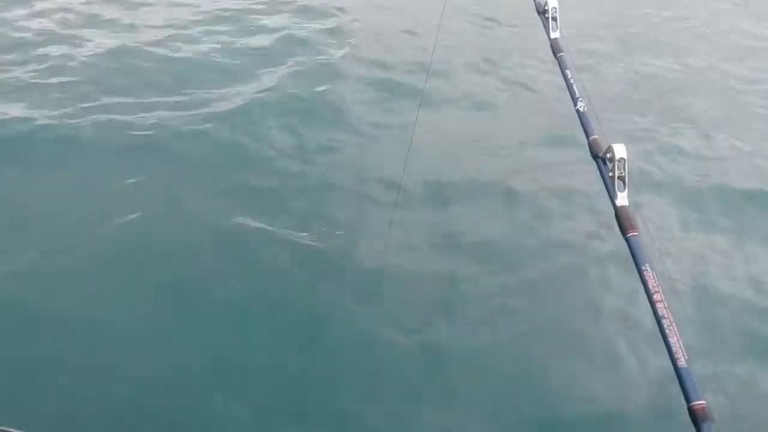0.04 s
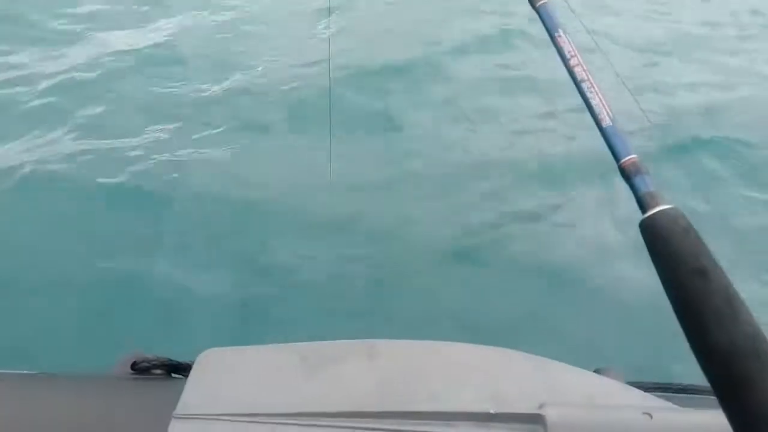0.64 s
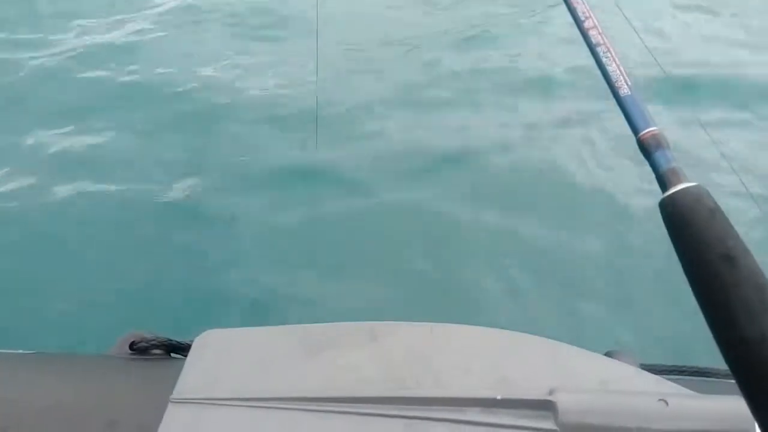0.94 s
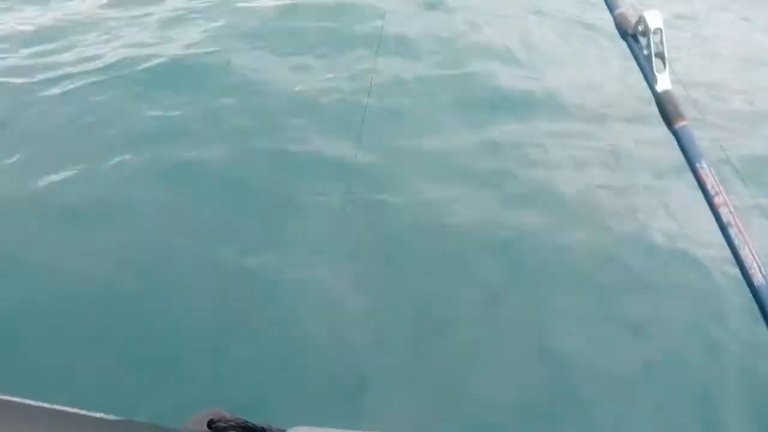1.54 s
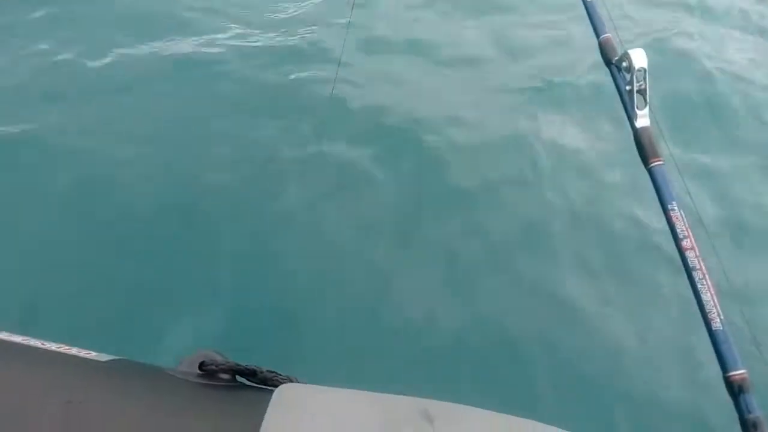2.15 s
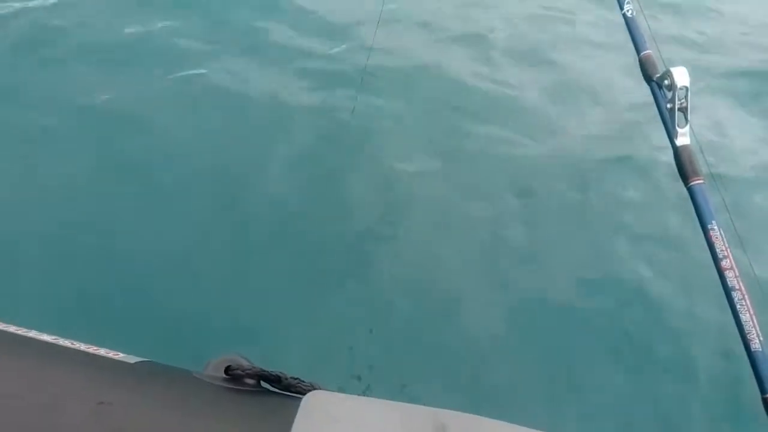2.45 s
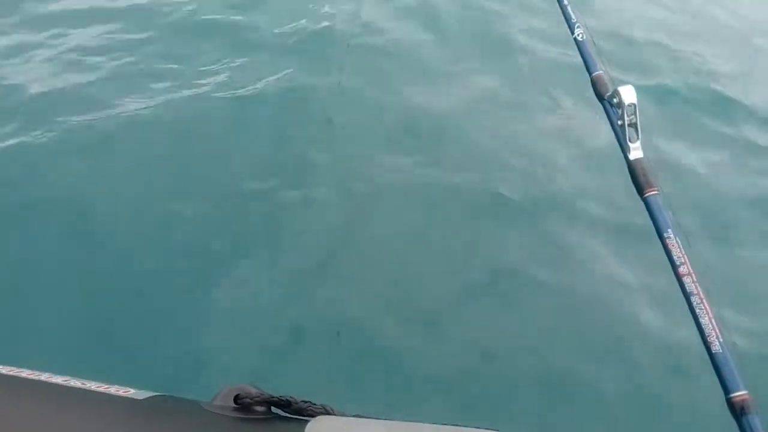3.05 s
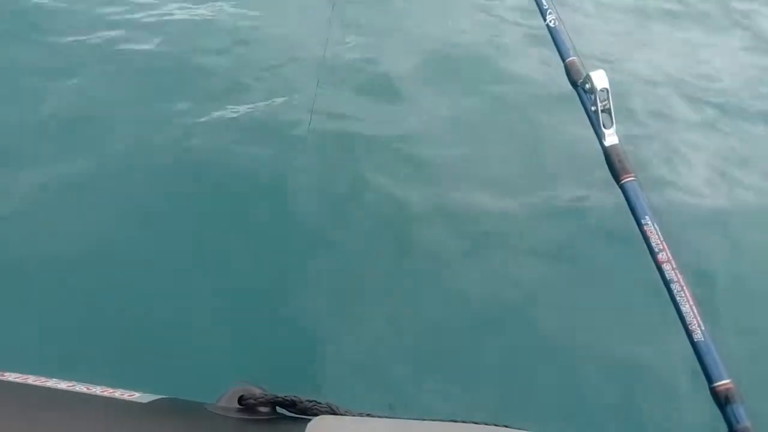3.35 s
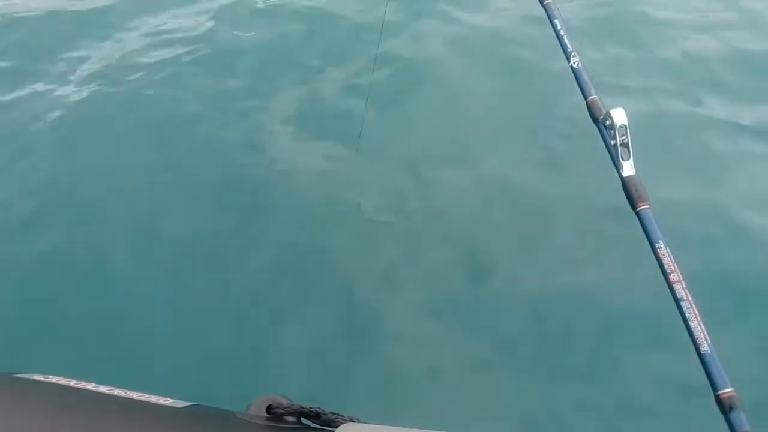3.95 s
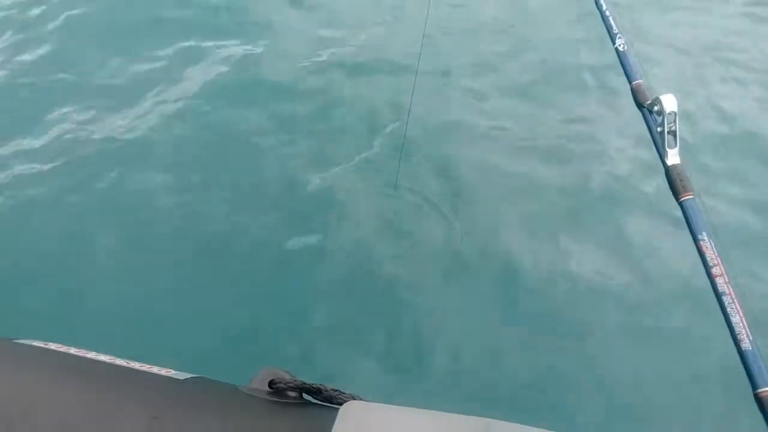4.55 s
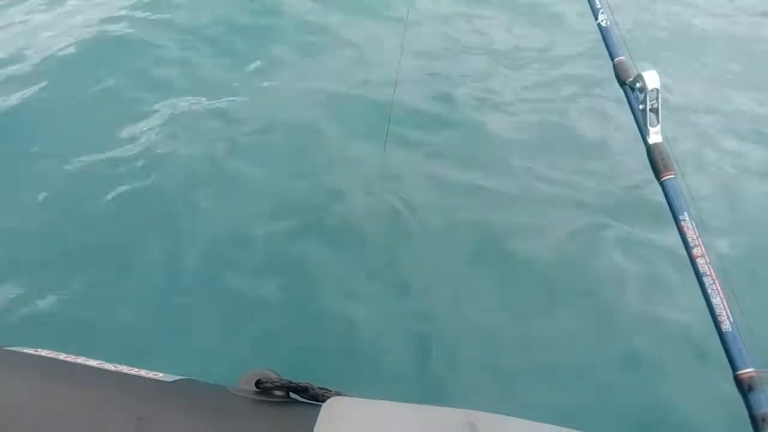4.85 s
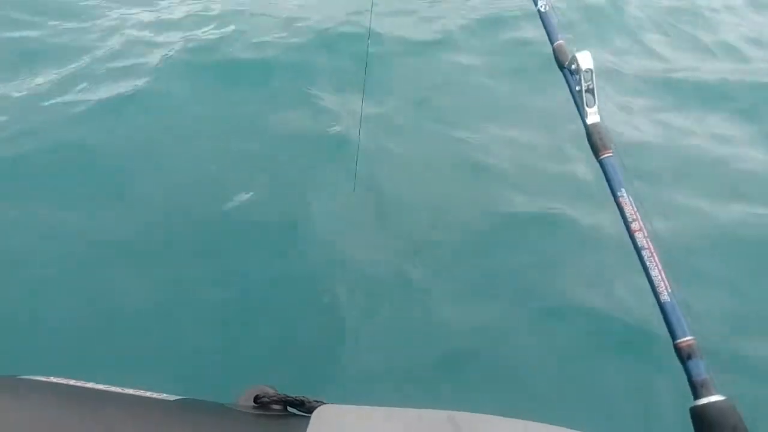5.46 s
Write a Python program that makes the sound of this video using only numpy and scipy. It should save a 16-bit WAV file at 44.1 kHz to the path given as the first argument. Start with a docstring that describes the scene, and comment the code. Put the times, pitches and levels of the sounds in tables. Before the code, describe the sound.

A close electric fishing reel runs with a steady, raspy gear whine that sags a little under load. Low wind rumble hits the microphone at the start, eases, then returns stronger as the fishing rod gives several hollow knocks against its holder on the boat. The motor finally winds down and stops with a small metallic snap and a few more knocks. The sea washes faintly underneath throughout.

```python
"""An electric fishing reel winds in line on a small boat, close to a microphone with two ports. Its meshing
gears whine, chatter and rasp, sagging as the swell loads the line, until the power is cut, the motor runs down
and a switch latch clicks. Gusts buffet each port over a faint wash of sea. The rod knocks in its holder,
thudding through the hull and ringing the reel's frame."""
import sys
import numpy as np
from scipy import signal
from scipy.fft import rfft, irfft, next_fast_len
from scipy.io import wavfile
from scipy.ndimage import uniform_filter1d

SR = 44100
rng = np.random.default_rng(int(sys.argv[2]) if len(sys.argv) > 2 else 0)


def unload_audio(sound):
    """Save the sound as a 16-bit wav file, at the path given as the first command line argument."""
    columns = np.transpose(np.atleast_2d(sound))
    # keep every value between -1 and 1, then stretch to whole-number steps
    steps = np.round(np.clip(columns, -1, 1) * 32767)
    wavfile.write(sys.argv[1], SR, steps.astype(np.int16))


N = 246959
TIME = np.arange(N) / SR
POWER_OFF_S, CRUISE_HZ = 5.119, 186
MESH_ORDER, WIRY_ORDER = 93 / 16, 17.8125  # an order is a multiple of the shaft rate

# The motor labours as the swell loads the line. Each row: time in seconds, shaft turns per second.
DRIVEN_SPEED = [(0, 187.3), (.47, 185.9), (.7, 192.9), (.8, 190.1), (.9, 193), (1.19, 195.1), (1.42, 185.8),
                (1.66, 187.6), (1.85, 185.6), (2.15, 187.4), (2.27, 184.9), (2.97, 187), (3.44, 179.7),
                (3.64, 183.6), (3.9, 176.3), (4.22, 180.1), (4.59, 178.2), (4.84, 190.7), (5.12, 194.4)]
# The microphone tips towards the reel. Each row: time in seconds, tilt from 0 to 1.
MIC_TILT = [(0, 0.2), (.35, 0.38), (.7, 0.69), (1.3, 0.67), (1.6, 0.42), (1.9, 0.2), (4.6, 0.09),
            (4.9, 0.13)]
# The notes of the pinion and of the spool gear. Each row: order, relative level in dB.
PINION_TONES = [(11, -13), (12, -.7), (12.1875, -14), (12.625, -11.5), (13, -5), (14, -13), (15, -17),
                (17, -17), (22.625, -19), (23.625, -15), (24, -15.5)]
SPOOL_GEAR_TONES = [(1, -14.5), (2, -18), (4.9375, -15), (5.3125, -10), (5.8125, -2.5), (6.1875, -6),
                    (6.8125, -12), (7.1875, 3.5), (10, -17)]
# The housing lifts tones that glide across its resonances. Each row: frequency in Hz, gain in dB.
HOUSING_EQ = [(370, -1.5), (700, -24), (1080, 0.5), (1350, -23), (1550, 1), (1850, 1.5), (2130, -4),
              (2240, -0.5), (2320, -1.5), (2480, -9), (2900, -5.5), (3220, -11), (3450, -8), (3900, -8.5),
              (4400, -4.5), (4600, -5), (6000, -24)]
# Fader rides for pinion, mesh octave, wiry overtone and whistle. Each row: time in seconds, gain in dB.
PINION_FADER = [(0, -35.5), (.42, -35), (.7, -29.5), (1.15, -28.5), (1.6, -29.5), (2.05, -34), (2.8, -34.3),
                (3.5, -34), (4.1, -33.3), (4.8, -32.5), (5.12, -30)]
OCTAVE_FADER = [(0, -51), (.45, -47), (.8, -39.5), (1.05, -34.5), (1.5, -39), (2, -44), (2.5, -48),
                (3.3, -44), (4.05, -45), (4.6, -47), (4.95, -38), (5.12, -38)]
WIRY_FADER = [(0, -57), (.47, -46), (.68, -59), (1.22, -62), (1.42, -46.5), (1.6, -49), (1.8, -58),
              (2.25, -47), (3, -50), (3.35, -46), (3.85, -45), (4.68, -50), (4.9, -65), (5.135, -62),
              (5.16, -40)]
WHISTLE_FADER = [(0, -54), (.5, -49), (1.2, -56), (1.6, -57), (2, -68), (4.2, -66), (4.9, -53)]
# Loose teeth chatter and thinly whistle. Each row: order, width in Hz, relative level in dB.
CHATTER_BANDS = [(6.194, 200, -8), (6.841, 154, -7), (8.85, 247, -20), (10.78, 240, -9.5),
                 (11.22, 405, -13.5), (12.4, 330, -5.5), (13.9, 130, -14), (16.71, 270, -10.5),
                 (17.55, 170, -9.5), (23.6, 220, -12.5), (30.67, 220, -22), (34.9, 340, -28)]
WHISTLE_BANDS = [(29.3, 150, 2)]
# Dry rasp of teeth and running line. Each row: frequency in Hz, relative level in dB.
RASP_SPECTRUM = [(100, -1), (650, -12.5), (830, -7), (1050, 0), (1280, 3), (1420, -3), (1650, -.5),
                 (2400, 2), (2650, 1), (2860, -3.5), (3100, -1), (3300, -1.5), (3450, -6.5), (3750, -8.5),
                 (4300, -10), (5150, -13), (5700, -12.5), (6100, -14), (6600, -13), (8200, -24),
                 (10000, -28), (11600, -23.5), (15000, -41)]
# How alike the two ports sound. Each row: frequency in Hz, likeness from 0 to 1.
PORT_LIKENESS = [(100, 0.79), (1100, 0.82), (2200, 0.41), (2700, 0.94), (3300, 0.69), (6000, 0.23),
                 (15000, 0)]
# The reel's colour at full tilt. Each row: frequency in Hz, gain in dB.
TILT_EQ = [(400, 4), (650, 1), (900, -5), (1420, -4.5), (1650, 0), (2200, -6), (2550, -1.5), (2780, 1.5),
           (3080, 1), (3400, -12.5), (3750, -5), (4350, -6), (4560, -11), (4850, 3), (5200, -3),
           (5700, -.5), (6800, -8.5), (8500, -5.5), (11500, -12)]
# The reel's stereo balance. Each row: frequency in Hz, left minus right in dB.
PORT_BALANCE = [(500, 1.5), (1080, 0.5), (1500, -2.5), (1950, -6.5), (2240, -5.8), (2700, 2.5), (2950, 2),
                (3300, 8), (3450, 9), (3750, 6), (4400, 7.5), (5000, -1), (6500, -6.5), (8000, -4),
                (9500, 0.5), (11500, -6.5), (14000, -1)]
# Sound bends around the microphone's body. Each row: frequency in Hz, left port's lead in radians.
LEFT_LEAD = [(50, 1), (500, -0.95), (1100, 0.17), (2240, 1.2), (2650, 2.5), (3010, 4), (3250, 4),
             (3700, 2.5), (4390, 2), (6370, 2), (8100, 3), (11600, 7.5), (15000, 11)]
# The breeze lulls and picks up again. Each row: time in seconds, strength in dB.
BREEZE = [(0, -25.5), (.7, -30.5), (1.15, -31.5), (1.9, -38), (2.9, -43), (3.62, -43), (3.8, -34),
          (4.5, -30.5), (4.9, -33), (5.25, -29.5), (5.6, -31)]
# Gusts. Each row: start in seconds, length in seconds, strength in dB, port (0 left, 1 right).
GUSTS = [(0, 0.084, -11, 1), (0, 0.048, -18, 0), (0.39, .06, -23, 1), (0.483, 0.083, -25, 0),
         (0.572, 0.21, -23.5, 1), (0.647, 0.035, -23, 0), (1.054, 0.0325, -24.5, 0),
         (1.172, 0.023, -23.5, 1), (1.458, 0.027, -24.5, 1), (1.614, .03, -30.5, 0), (1.715, 0.023, -30, 1),
         (1.848, 0.026, -30, 1), (1.981, 0.027, -19.5, 1), (2.031, 0.042, -19.5, 1), (2.199, 0.15, -33, 1),
         (2.424, 0.13, -23.5, 1), (2.74, 0.037, -35.5, 0), (2.969, 0.027, -34.5, 1), (3.331, 0.16, -31, 1),
         (3.924, 0.048, -16, 1), (4.066, 0.049, -16.5, 1), (4.156, .11, -17, 1), (4.32, 0.14, -16, 1),
         (4.5, 0.037, -13, 1), (4.504, 0.037, -22.5, 0), (4.934, 0.033, -16, 1), (5.052, 0.0758, -16, 1),
         (5.371, 0.028, -27, 1), (5.475, 0.075, -19, 1), (5.533, 0.013, -25.5, 0)]
# Low wind buffet, its brighter flutter, and the sea. Each row: frequency in Hz, relative level in dB.
BUFFET_SPECTRUM = [(15, -16), (35, -19), (60, -2.5), (100, 2.5), (150, -0.5), (250, -10.5), (400, -28.5),
                   (700, -59.5), (1500, -74), (4000, -71), (15000, -106)]
FLUTTER_SPECTRUM = [(60, -13.5), (200, 6), (330, 1.5), (500, -10), (800, -16.5), (1300, -51.5),
                    (2500, -71.5), (8000, -80)]
SEA_SPECTRUM = [(30, -24), (90, 9), (150, 16.5), (400, -12), (1000, -9), (2000, -16), (4000, -27),
                (8000, -37), (15000, -58)]
# Slaps of wind. Each row: centre in seconds, peak in dB, half width in seconds.
WIND_SLAPS = [(0.013, 0.5, 0.00041), (0.0206, 2.5, 0.00095), (0.0268, -5, 0.00044), (0.0302, -4, 0.00051),
              (0.037, -3.5, 0.00045), (0.0507, -6.5, .0007), (.0553, -7, 0.00044), (0.069, -1.5, 0.00093),
              (.091, -6.5, 0.00045), (.686, -3.5, 0.00088), (2.007, -8.5, 0.0023), (2.067, -6, 0.0021),
              (2.48, -13.5, 0.000818), (4.029, -10, 0.0009), (4.243, -7, 0.00074), (4.533, -6.5, 0.00083),
              (4.968, -10, 0.00098), (5.092, -6.5, 0.00076), (5.504, -15.5, 0.00045),
              (5.512, -5.5, 0.00062)]
# Rod and reel knock. Each row: start in seconds, levels of hull thud, hollow clack, frame ring and
# hard tick in dB, top of the tick in Hz, the tick's t60 (time to fall 60 dB) in seconds.
ROD_KNOCKS = [(0.353, -48, -42, -48, -29, 8000, 0.045), (.555, -24, -26, -45, -34, 6000, 0.059),
              (1.358, -36, -36, -44, -30, 4000, .02), (1.417, -48, -42, -50, -26, 11000, 0.031),
              (1.468, -33, -31, -50, -29, 8000, 0.04), (3.8976, -14, -16.5, -25, -23, 11000, 0.075),
              (3.908, -16, -22, -31, -33, 6000, .04), (3.9155, -28, -33, -40, -30, 8000, .04),
              (3.9294, -18, -21.5, -34, -20.5, 9000, 0.036), (4.314, -19.5, -30, -46, -33.5, 8000, 0.182),
              (4.8, -24.5, -24, -31, -31.5, 7000, 0.055), (5.238, -17, -53, -48.5, -38, 11000, .04),
              (5.2498, -17.5, -28, -32, -26, 5970, 0.075), (5.257, -34, -32, -37, -36, 5000, 0.053),
              (5.3276, -24.5, -31, -27, -28.5, 5730, 0.07), (5.3406, -30.5, -31, -39, -38.5, 4500, 0.04),
              (5.3608, -28, -49, -56, -33.5, 9000, 0.054), (5.41, -32.5, -40.5, -63, -59, 4000, 0.063),
              (5.533, -28.5, -38.5, -62, -56.5, 4500, 0.054)]
# A knock's hollow clack and hard tick. Each row: frequency in Hz, relative level in dB.
CLACK_SPECTRUM = [(100, 3.5), (300, 4), (600, 1), (880, 4), (1150, 2.5), (1500, -6.5), (2100, -28),
                  (3000, -44.5), (15000, -45.5)]
TICK_SPECTRUM = [(300, -5), (1000, 5), (1900, 6), (3200, 4), (4500, -0.5), (6500, -0.5), (8500, -15.5),
                 (11500, -18), (15000, -38)]
# Hull with holder, and the reel's frame. Each row: pitch in Hz, relative level in dB, t60 in seconds.
HULL_MODES = [(121.9, -1.5, 0.35), (138, -11, 0.19), (255.6, -8, 0.11), (421, -12, 0.095),
              (640, -34, 0.031), (871, -12.5, 0.041), (1090, -22, 0.027)]
FRAME_MODES = [(865, 1.5, 0.06), (1090, -4, 0.04), (1370, -6, 0.05), (1860, -3, 0.038), (1940, -1, 0.06),
               (2330, .5, 0.04), (2560, -4, .04), (2870, -4, 0.0356), (2930, -5.5, 0.053),
               (3354, -5.5, 0.057), (4000, -6, 0.03)]


def amp(db):
    """Decibels as a gain."""
    return 10 ** (np.asarray(db) / 20)


def unit(x):
    """Scales to rms 1."""
    return x / np.sqrt(np.mean(abs(x) ** 2) + 1e-20)


def curve(rows):
    """A time table, at every sample."""
    return np.interp(TIME, *np.transpose(rows))


def read(points, hz):
    """A spectrum table on a log-frequency axis."""
    f, value = np.transpose(points)
    return np.interp(np.log(hz + 1), np.log(f + 1), value)


def filtered(x, response):
    """Applies a gain given as a function of frequency."""
    size = next_fast_len(x.shape[-1] + SR // 20)
    return irfft(rfft(x, size) * response(np.fft.rfftfreq(size, 1 / SR)), size)[..., :x.shape[-1]]


def equalised(x, eq):
    """Applies a table of gains in dB."""
    return filtered(x, lambda hz: amp(read(eq, hz)))


def coloured(x, spectrum):
    """Gives x a spectrum, at rms 1."""
    return unit(equalised(x, spectrum))


def waver(hz):
    """Smooth random motion of rms 1, up to about hz."""
    return unit(filtered(rng.standard_normal(N), lambda f: 1 / (1 + (f / hz) ** 4)))


def add(mix, start_s, sound):
    """Lays a stereo sound into the mix."""
    part = mix[:, round(start_s * SR):][:, :sound.shape[1]]
    part += sound[:, :part.shape[1]]


def partly_alike(pair):
    """Two unrelated noises become what two nearby ports hear of one source."""
    same = lambda hz: np.clip(read(PORT_LIKENESS, hz), 0, 1)
    right = filtered(pair[0], same) + filtered(pair[1], lambda hz: np.sqrt(1 - same(hz) ** 2))
    return np.array([pair[0], right])


def since(start_s):
    """Seconds since a moment, zero before it."""
    return np.maximum(TIME - start_s, 0)


def slackness(unload_s=0.0085):
    """How slack the gears are: 0 under power, 1 just after it is cut."""
    return 1 - np.exp(-since(POWER_OFF_S) / unload_s)


def shaft_motion(wobble_hz=1.45, turns_per_spool_turn=40.45, coast_s=0.118):
    """Shaft speed and turns made: the load wobbles with each spool turn; unpowered, the shaft coasts."""
    driven = curve(DRIVEN_SPEED)
    wobble = wobble_hz * np.cos(2 * np.pi * np.cumsum(driven) / SR / turns_per_spool_turn)
    speed = (driven + wobble) * np.exp(-since(POWER_OFF_S) / coast_s)
    # slack teeth rattle, which breaks up the tones
    slack_jitter = 0.022 * (1 - speed / driven) * (TIME > POWER_OFF_S) * waver(140)
    running_jitter = 0.00199 * waver(31.73)
    return speed, np.cumsum(speed * (1 + running_jitter + slack_jitter)) / SR


def part_gain(base_db, tilt_db, db_per_hz):
    """A part of the reel grows louder as the microphone tips towards it and the motor drives faster."""
    return amp(base_db + tilt_db * curve(MIC_TILT) + db_per_hz * (curve(DRIVEN_SPEED) - CRUISE_HZ))


def mesh_tones(table, turns, left_db, flutter=0.24, drift_rad=0.13):
    """Clean tones locked to the shaft, each fluttering in level and drifting between the ports."""
    out = np.zeros((2, N))
    for order, db in table:
        angle = 2 * np.pi * (order * turns + rng.random())
        apart = drift_rad * waver(hz=5)
        out += amp(db) * (1 + flutter * waver(hz=26)) * np.cos([angle + apart, angle - apart])
    return np.sqrt(2) * out * amp([[left_db / 2], [-left_db / 2]])


def gear_whine(speed, turns, slack_db=-2.5):
    """Pinion and spool gear sing through the housing; together they add a wiry overtone."""
    pinion = amp(curve(PINION_FADER)) * mesh_tones(PINION_TONES, turns, left_db=-1.5, flutter=0.25)
    gear = mesh_tones(SPOOL_GEAR_TONES, turns, left_db=0.5, flutter=0.3)
    gear *= part_gain(base_db=-36.5, tilt_db=8, db_per_hz=0.069)
    force = speed / np.median(speed)  # teeth meet more softly as the shaft slows
    housed = equalised((pinion + gear) * force, HOUSING_EQ)
    octave = amp(curve(OCTAVE_FADER)) * mesh_tones([(2 * MESH_ORDER, 0)], turns, left_db=5)
    wiry = mesh_tones([(WIRY_ORDER, 0)], turns, left_db=11, flutter=0.4, drift_rad=0.2)
    return (housed + octave) * amp(slack_db * slackness()) + amp(curve(WIRY_FADER)) * wiry


def tooth_pressure(turns):
    """The spool gear and an idler press the teeth together unevenly; once slack, they rattle."""
    gear_angle = 2 * np.pi * turns / 16  # one revolution in 16 shaft turns
    gear_throb = 0.018 * (np.cos(gear_angle) + np.cos(2 * gear_angle + 1))
    idler_throb = 0.0755 * np.cos(6 * gear_angle)
    lumps = 0.17 * np.tanh(waver(hz=35))
    rattle = 0.35 * slackness() * np.tanh(waver(hz=70))
    return unit(np.exp(gear_throb + idler_throb + lumps)) * np.exp(rattle)


def tooth_chatter(bands, turns):
    """Tooth impacts of uneven strength smear each mesh tone into a fuzzy band."""
    out = np.zeros((2, N))
    for order, width_hz, db in bands:
        noise = rng.standard_normal((2, 2, N))
        uneven = filtered(noise, lambda hz: 1 / (1 + (hz / (0.5 * width_hz)) ** 3))
        angle = 2 * np.pi * order * turns
        out += amp(db) * unit(uneven[0] * np.cos(angle) + uneven[1] * np.sin(angle))
    return out


def teeth_and_line(turns, tooth_depth=0.26, grit=0.17, hiss_edge_hz=4200):
    """Each tooth scrapes as it meshes, under chatter and whistle; the running line hisses on top."""
    pulses = 1 + tooth_depth * np.cos(2 * np.pi * MESH_ORDER * turns)
    roughness = np.exp(grit * waver(hz=890))
    scrape = coloured(pulses * roughness * rng.standard_normal((2, N)), RASP_SPECTRUM)
    rasp = filtered(scrape, lambda hz: 1 / (1 + (hz / hiss_edge_hz) ** 8))
    hiss = (scrape - rasp) * part_gain(base_db=-32, tilt_db=11.3, db_per_hz=0.027)
    teeth = tooth_chatter(CHATTER_BANDS, turns) + amp(4) * rasp
    teeth *= part_gain(base_db=-38, tilt_db=8.83, db_per_hz=0.055)
    whistle = amp(curve(WHISTLE_FADER)) * tooth_chatter(WHISTLE_BANDS, turns)
    return partly_alike(teeth + hiss + whistle)


def at_ports(sound):
    """Tilt recolours the reel, and the microphone's body shades and delays it differently per port."""
    tilt = curve(MIC_TILT)
    left, right = (1 - tilt) * sound + tilt * equalised(sound, TILT_EQ)
    lean = lambda hz: amp(read(PORT_BALANCE, hz) / 2)
    lag = lambda hz: np.exp(-1j * read(LEFT_LEAD, hz))
    return np.array([filtered(left, lean), filtered(right, lambda hz: lag(hz) / lean(hz))])


def reel(unload_db=-4, die_away_s=0.34):
    """One shaft drives whine and chatter; with the power cut they drop at once, then die away."""
    speed, turns = shaft_motion()
    whine = gear_whine(speed, turns)
    pressure = tooth_pressure(turns)
    running = whine * np.sqrt(pressure) + teeth_and_line(turns) * pressure
    run_down = amp(unload_db * slackness() - 60 * (since(POWER_OFF_S) / die_away_s) ** 2)
    return at_ports(running * run_down)


def airflow(port, breeze_db, attack_s=0.013, release_s=0.018):
    """Strength of the wind on one port: a lumpy breeze, and gusts that rise, hold and die away."""
    power = amp(curve(BREEZE) + breeze_db + 2 * waver(hz=14)) ** 2
    for start, length, db, side in GUSTS:
        if side == port:
            attack = np.clip((TIME - start) / attack_s + 0.5, 0, 1)
            release = np.exp(-since(start + length) / release_s)
            power += (amp(db) * attack * release) ** 2
    return np.sqrt(power)


def wind(strength, buffet_db, flutter_db, steadiness=0.47, flutter_growth=0.42):
    """Eddies push on one port; strong gusts tear into a brighter flutter."""
    eddies = coloured(rng.standard_normal(N), BUFFET_SPECTRUM)
    local_power = uniform_filter1d(eddies ** 2, size=2200) + 1e-6
    buffet = unit(eddies / local_power ** (steadiness / 2))
    bursts = rng.standard_normal(N) * np.exp(0.864 * np.clip(waver(hz=140), -2, 2))
    flutter = strength ** flutter_growth * coloured(bursts, FLUTTER_SPECTRUM)
    return strength * (amp(buffet_db) * buffet + amp(flutter_db) * flutter)


def sea(level_db=-49, swell_db=2):
    """Faint wash of water around the hull."""
    return amp(level_db + swell_db * waver(hz=3.6)) * coloured(rng.standard_normal((2, N)), SEA_SPECTRUM)


def wind_slaps():
    """Eddies break on the right port: each a quick dip of pressure and its rebound."""
    out = np.zeros((2, N))
    for centre_s, db, half_width_s in WIND_SLAPS:
        offset = np.clip((TIME - centre_s) / half_width_s, -10, 10)
        out[1] += amp(db) * (offset ** 2 - 1) * np.exp(-offset ** 2 / 2)
    return out


def rod_knocks(rise_s=0.00034, thud_rise_s=0.0024, crack_hz=4000, clack_stretch=1.4):
    """Each blow cracks on contact, thuds through the hull, rattles the holder and rings the frame."""
    out, t = np.zeros((2, N)), np.arange(SR // 3) / SR
    decay = lambda t60: amp(-60 * t / t60)
    hull = sum(amp(db) * decay(t60) * np.sin(2 * np.pi * hz * t) for hz, db, t60 in HULL_MODES)
    thud = hull * (1 - np.exp(-t / thud_rise_s))
    crack = amp(9.5) * decay(0.0012) * np.sin(2 * np.pi * crack_hz * t)
    snap, deck_tail = 0.56 * decay(0.0037), amp(-25) * decay(0.26)
    for start, thud_db, clack_db, frame_db, tick_db, top_hz, t60 in ROD_KNOCKS:
        clack = partly_alike(coloured(rng.standard_normal((2, len(t))), CLACK_SPECTRUM))
        clack *= decay(t60 * clack_stretch) + deck_tail
        tick = partly_alike(coloured(rng.standard_normal((2, len(t))), TICK_SPECTRUM))
        tick = filtered(tick, lambda hz: 1 / np.sqrt(1 + (hz / top_hz) ** 6))
        tick *= snap + decay(t60) + deck_tail
        ring = amp(clack_db) * clack + amp(tick_db) * tick
        for hz, db, ring_s in FRAME_MODES:
            port_phases = 2 * np.pi * rng.random() + rng.standard_normal((2, 1))
            ring += amp(frame_db + db) * decay(ring_s) * np.sin(2 * np.pi * hz * t + port_phases)
        add(out, start, amp(tick_db) * crack + amp(thud_db) * thud + ring * (1 - np.exp(-t / rise_s)))
    return out


def latch_click(start_s=5.2395, level_db=-35, t60=0.016, ring_hz=11300, half_width_hz=2200):
    """A small switch latch clicks as the reel runs down: one thin, bright snap."""
    out, t = np.zeros((2, N)), np.arange(SR // 4) / SR
    noise = rng.standard_normal((2, len(t)))
    ring = unit(filtered(noise, lambda hz: 1 / (1 + ((hz - ring_hz) / half_width_hz) ** 2)))
    add(out, start_s, ring * amp(level_db - 60 * t / t60))
    return out


def scene():
    """The reel up close, separate wind on each port, knocks on top and the sea beneath."""
    left_wind = wind(airflow(port=0, breeze_db=-0.5), buffet_db=0.5, flutter_db=2)
    right_wind = wind(airflow(port=1, breeze_db=2), buffet_db=-1, flutter_db=-0.5)
    return reel() + np.array([left_wind, right_wind]) + wind_slaps() + rod_knocks() + latch_click() + sea()


def record(dry, cutoff_hz=15250):
    """Peaks flatten at full scale, then a steep low-pass takes off the highest treble."""
    lowpass = signal.firwin(401, cutoff_hz, window=("kaiser", 8), fs=SR)
    return signal.oaconvolve(np.clip(dry, -1, 1), lowpass[None], "same")


dry = scene()
out = record(dry)
unload_audio(out)
```